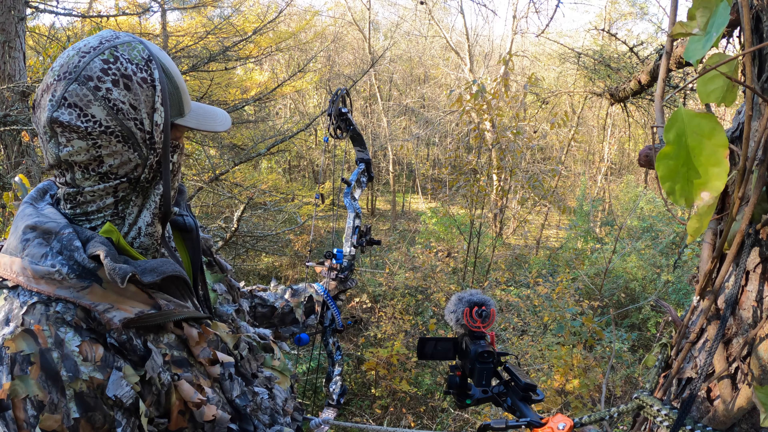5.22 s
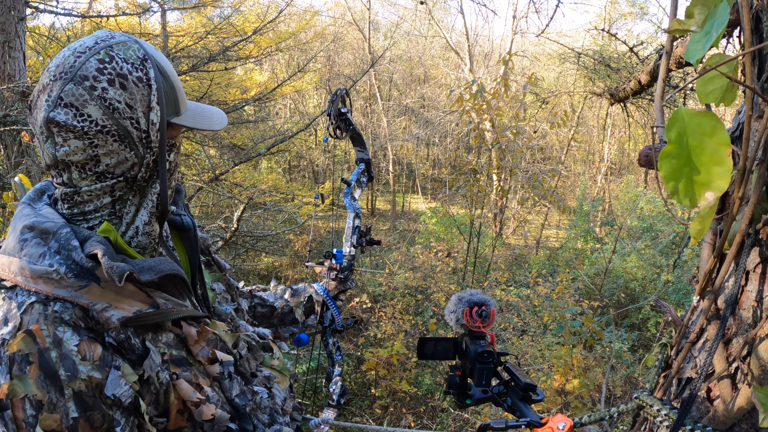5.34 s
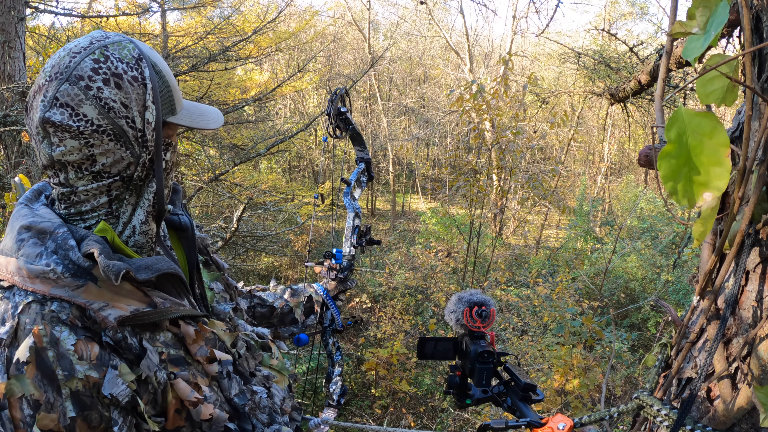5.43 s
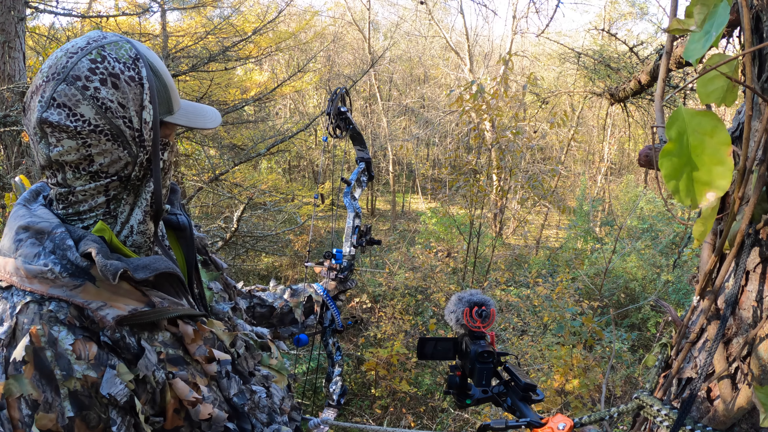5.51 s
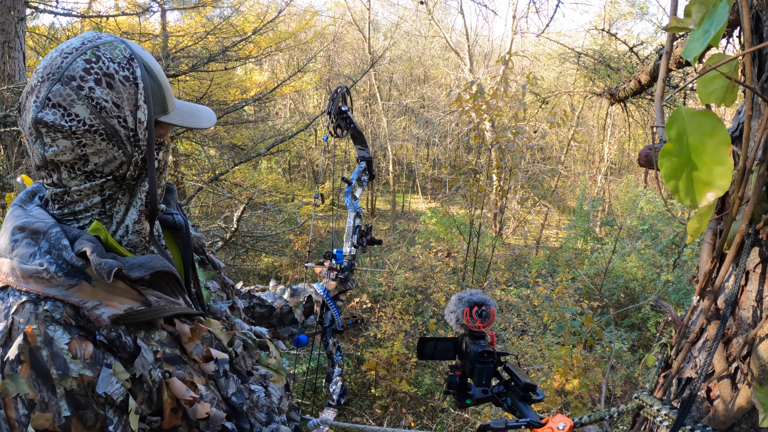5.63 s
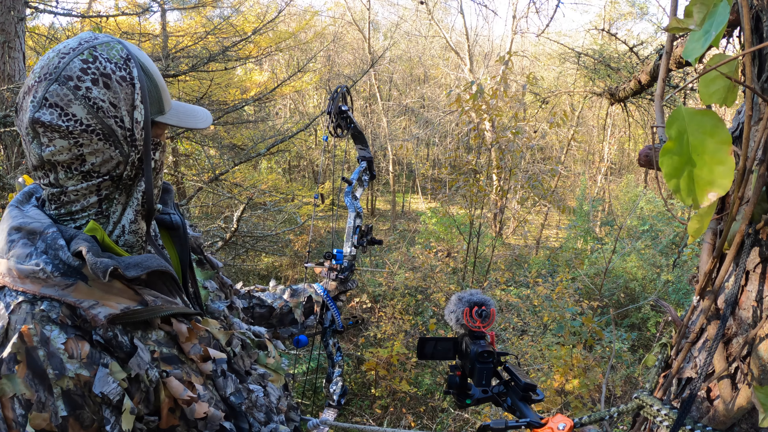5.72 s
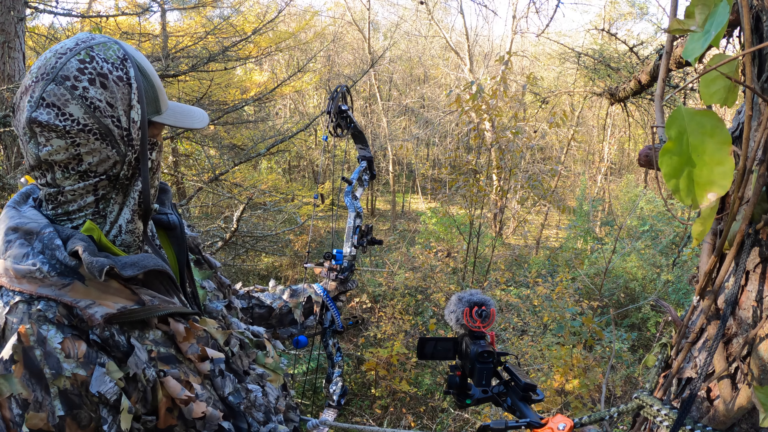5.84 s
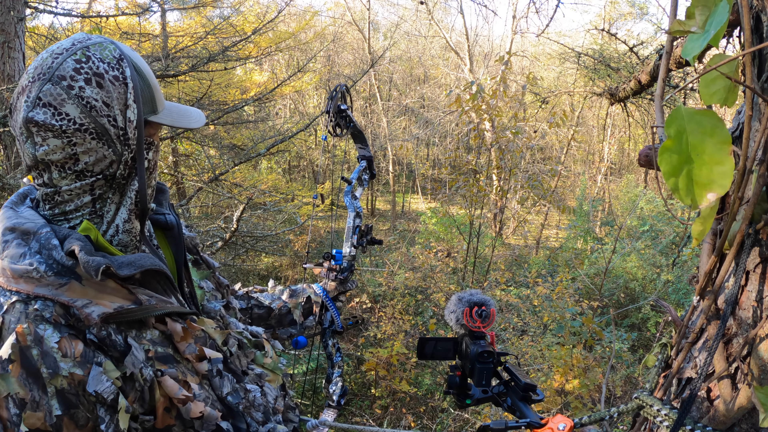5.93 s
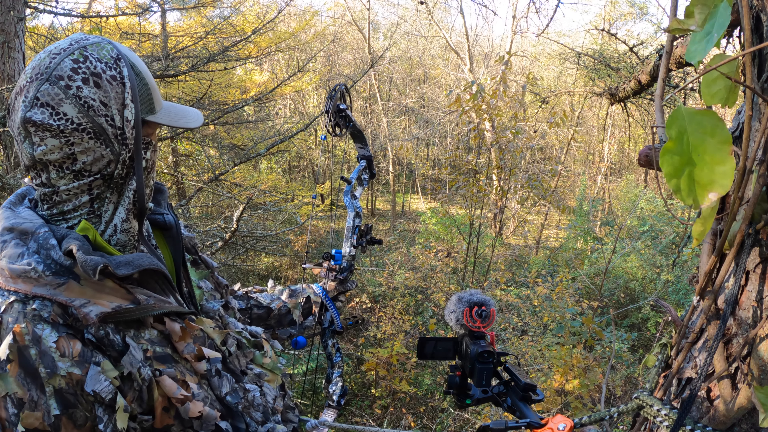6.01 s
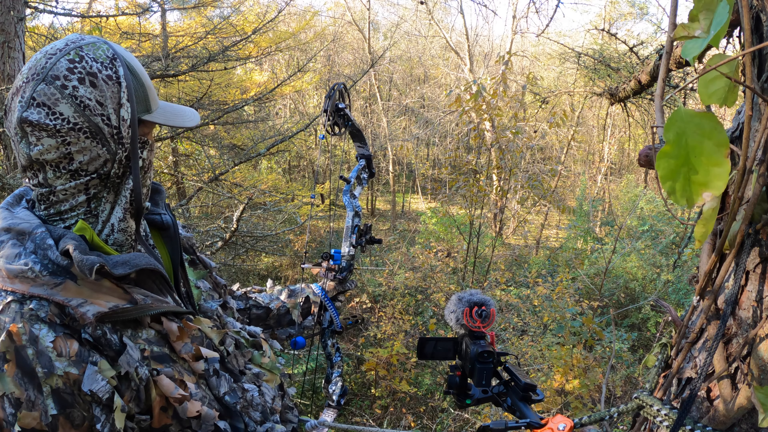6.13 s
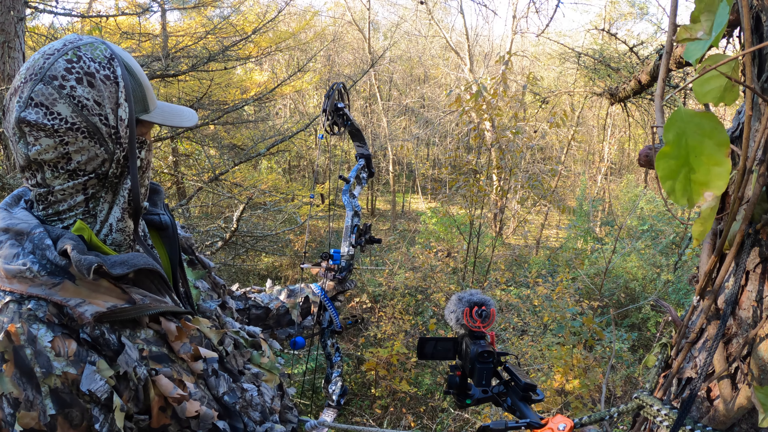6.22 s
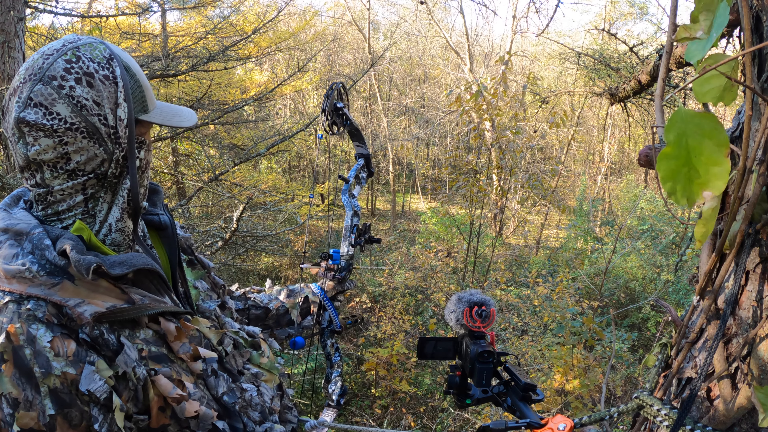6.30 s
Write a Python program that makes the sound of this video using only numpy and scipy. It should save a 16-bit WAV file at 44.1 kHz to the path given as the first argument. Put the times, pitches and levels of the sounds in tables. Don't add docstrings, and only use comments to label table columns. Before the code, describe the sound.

Outdoors in an open wood, a distant small propeller plane drones throughout, a low buzzing hum with a soft airy roar that wavers, grows stronger in the second half and sinks slightly in pitch. Thin high bird chirps come singly, then in a quick cluster midway. Dry twig ticks dot the quiet leaf hiss. Low wind puffs brush the stereo microphone, and a jacket rustles at the very end.

```python
import sys
import numpy as np
from scipy import signal
from scipy.fft import rfft, irfft
from scipy.io import wavfile
from scipy.ndimage import uniform_filter1d

SR = 44100
rng = np.random.default_rng(int(sys.argv[2]) if len(sys.argv) > 2 else 0)


def decibels_to_gain(level_db):
    exponent = np.asarray(level_db, float) / 20
    return 10 ** exponent


def wrap_up_sound(samples):
    columns = np.atleast_2d(samples).T
    tamed = np.clip(columns, -1, 1)
    steps = np.round(tamed * 32767).astype(np.int16)
    wavfile.write(sys.argv[1], SR, steps)


N = 280917

# t/s, level/dB, brightness/dB per octave
ROAR_COURSE = [(0.0, -52, -0.5), (1.2, -52, -0.1), (2.25, -53, 2), (2.42, -50, 2.5), (2.68, -47, -1),
               (3.1, -52.5, 1.5), (3.22, -47, -0.9), (3.73, -49.5, .5), (4.15, -47.5, 0.5),
               (4.26, -49.5, 1.5), (4.63, -43.5, -3.5), (4.85, -45.5, -1.5), (5.34, -54, 5),
               (5.55, -47.5, 2.5), (5.72, -45.5, 0.5), (5.95, -49, 2.5), (6.29, -43, 0.5), (6.37, -43, -4)]
BLADE_HZ, SINK_HZ_PER_S, SINK_HZ_PER_S2 = 90.05, .68, .03


def evened(x):
    return x / np.sqrt(np.mean(abs(x) ** 2) + 1e-20)


def read(points, hz):
    f, value = np.transpose(points)
    return np.interp(np.log(hz + 1), np.log(f + 1), value)


def curves(rows, t):
    s, *columns = np.transpose(rows)
    return [np.interp(t, s, c) for c in columns]


def wander(rate_hz):
    t = np.arange(0, N + 256, 256) / SR
    rates_hz = rate_hz * np.geomspace(.1, 1, 16)
    slow = sum(np.sin(2 * np.pi * (f * t + rng.random())) / np.sqrt(f) for f in rates_hz)
    return np.interp(np.arange(N) / SR, t, evened(slow))


def swells(rows, t):
    coarse = t[::128]
    total = 0 * coarse
    for s, half, db in rows:
        total = total + decibels_to_gain(db) * np.exp(-((coarse - s) / half) ** 2)
    return np.interp(t, coarse, total)


def ports(hz):
    # f/Hz, left minus right level/dB
    lean = [(60, -.3), (110, -.2), (200, -.7), (360, -1.2), (650, -2), (1200, -3.3), (2100, -2.8),
            (4000, -1.8), (7000, -2), (12800, -5)]
    # f/Hz, phase by which the left leads/rad
    lead = [(30, 0), (100, .01), (180, .075), (300, .175), (900, .4), (3000, .95), (4300, .01),
            (13000, -.1)]
    half = decibels_to_gain(read(lean, hz) / 2) * np.exp(.5j * read(lead, hz))
    return np.array([half, 1 / half])


def noise(field_db, patchy_db, size):
    # f/Hz, left-right coherence
    likeness = [(60, 1), (300, .995), (600, .93), (1280, .85), (2760, .73), (5900, .72), (12800, .62)]
    t = np.arange(4 * N // size + 5) * size / 4 / SR
    hz = np.fft.rfftfreq(size, 1 / SR)[:, None]
    a, b, c, d, patches = rng.standard_normal((len(t), len(hz), 5)).T
    patches = uniform_filter1d(patches, size // 80, 0)
    patches = evened(uniform_filter1d(patches, 16000 // size, 1))
    same = np.clip(read(likeness, hz), -1, 1)
    left = a + 1j * b
    right = same * left + np.sqrt(1 - same ** 2) * (c + 1j * d)
    spectra = np.array([left, right]) * ports(hz)
    spectra *= decibels_to_gain(field_db(t, hz) + patchy_db * patches)
    return evened(signal.istft(spectra, nperseg=size, noverlap=3 * size // 4)[1][:, :N])


def add(mix, s, sound, pan_db):
    part = mix[:, round(s * SR):][:, :sound.shape[-1]]
    part += (sound * decibels_to_gain(np.array([[.5], [-.5]]) * pan_db))[:, :part.shape[1]]


def trunks(x, t60):
    t = np.arange(SR // 2) / SR
    struck = rng.random((2, len(t))) < .012
    taps = rng.standard_normal((2, len(t))) * struck * decibels_to_gain(-60 * t / t60) * (t > .004)
    taps[1] += .35 * taps[0]
    taps = taps / np.linalg.norm(taps, axis=1, keepdims=True)
    return signal.fftconvolve(x, taps, axes=1)[:, :N]


def wood():
    # f/Hz, level/dB per Hz
    hiss_tone = [(1200, -39.5), (2000, -12.5), (3000, -2), (4500, -1), (6000, -1.5), (7800, -3), (8400, -9),
                 (11500, -14.5), (12600, -19), (13400, -28), (14200, -38), (16000, -65)]
    # t/s, half-length/s, level/dB
    leaf_stirs = [
        (.6, .2, -79),
        (2.4, .15, -82),
        (5.7, 0.04, -79),
        (5.97, 0.1, -75),
    ]
    t = np.arange(N) / SR
    level_db = -63 - 0.79 * t + .5 * wander(6.6)
    level = decibels_to_gain(level_db) + swells(leaf_stirs, t)
    return level * noise(lambda s, hz: read(hiss_tone, hz) + 0 * s, 1.0, size=512)


def wind():
    # f/Hz, level/dB
    puff_tone = [(8, -20), (22, -2), (40, 0), (65, -5), (100, -14), (200, -29), (400, -50), (1000, -110)]
    # t/s, half-length/s, level/dB
    gusts = [(0.47, 0.03, -45.9), (2.69, 0.08, -40.4), (3.22, 0.18, -44), (3.23, 0.049, -42),
             (3.42, 0.056, -42), (3.68, 0.12, -34), (3.85, 0.067, -31), (3.96, 0.03, -44),
             (4.06, 0.18, -35.5), (4.29, 0.037, -30.5), (4.41, 0.11, -34.5), (4.43, 0.034, -40),
             (4.63, 0.065, -33.5), (4.77, 0.03, -29), (4.87, 0.03, -30.5), (5.09, 0.08, -34),
             (5.19, 0.024, -33.5), (5.22, 0.094, -36), (5.6, 0.072, -46), (5.81, 0.06, -43),
             (5.9, 0.037, -37), (6.0, .05, -48), (6.13, 0.093, -35), (6.37, 0.061, -35)]
    hz = np.fft.rfftfreq(N, 1 / SR)
    puff, other = irfft(rfft(rng.standard_normal((2, N))) * decibels_to_gain(read(puff_tone, hz)), N)
    both_ports = np.array([1.32 * evened(puff), .68 * evened(puff + .12 * other)])
    return swells(gusts, np.arange(N) / SR) * decibels_to_gain(2.7 * wander(7.2)) * both_ports


def ticks():
    snaps = [(0.2377, -52, -2, 6900, 3030), (1.051, -59, -2.5, 5000, 3000), (1.8128, -55, -4, 5800, 2000),
             (1.8314, -48, -3, 6135, 2000), (2.673, -48, -3, 6000, 3500), (3.3257, -52, -4.5, 8160, 3500),
             (3.8707, -45.5, -5.5, 6550, 1500), (3.871, -52, -3.5, 11500, 8000),
             (3.875, -49, 0, 7300, 1502), (3.877, -51, -4, 4180, 1500), (3.9644, -53, -1, 6860, 1200),
             (5.1483, -49, 2, 4400, 1100), (5.65, -50, -1, 5130, 1100), (5.961, -43.5, -5.5, 6000, 4500),
             (6.2113, -56.5, -2, 9300, 2500), (6.218, -56, -8, 6500, 3983), (5.685, -53.5, -2, 6000, 3500),
             (5.756, -55, -2, 6520, 4000), (6.264, -41, -3, 5200, 2000), (6.288, -48, -1, 8500, 5000),
             (6.305, -52, -3, 10500, 5000), (6.312, -52, -2, 8000, 3000), (6.331, -43, 1, 4500, 1500),
             (5.703, -52, -2, 3000, 1200), (6.035, -61, -2, 7500, 3000), (6.225, -55, -2, 5200, 1500),
             (6.247, -52, -2, 5300, 1500), (6.256, -52, -2, 4200, 2000), (6.27, -50.5, -2, 7500, 2500),
             (6.294, -53, -2, 7600, 1500), (6.3, -50, -2, 5500, 2500), (6.304, -48, -2, 3200, 1500),
             (6.318, -54, -2, 9000, 2500), (5.889, -53, -2, 5600, 1500), (3.493, -54, -2, 4600, 1200),
             (3.636, -56, -2, 5800, 2000), (3.738, -51, -2, 4900, 1200), (6.2345, -57.5, -2, 10500, 4000),
             (6.344, -55, -2, 9000, 5000)]
    out, t = np.zeros((2, N)), np.arange(400) / SR
    for s, db, pan_db, hz, spread_hz in snaps:
        r = np.exp(-np.pi * spread_hz / SR)
        ring = [1, 0, -1, 1, -2 * r * np.cos(2 * np.pi * hz / SR), r * r]
        edge = (t == 0) + .25 * rng.standard_normal(len(t)) * decibels_to_gain(-60 * t / 0.009)
        snap = signal.sosfilt([ring, ring], edge)
        add(out, s, decibels_to_gain(db) * snap / abs(snap).max(), pan_db)
    return out + .35 * trunks(out, .08)


def birds():
    # t/s, start f/Hz, top f/Hz, length/s, level/dB
    chirps = [(0.362, 6500, 7500, 0.04, -56), (0.638, 6890, 7680, 0.055, -53),
              (1.221, 6630, 7280, 0.065, -54.5), (2.52, 6700, 7950, 0.022, -55.5),
              (3.376, 6770, 7800, 0.04, -52.5), (3.411, 7300, 8180, .035, -53.5),
              (3.435, 4620, 5660, 0.021, -68), (3.464, 6320, 7600, 0.038, -47.5),
              (3.48, 4300, 5400, .012, -63), (3.582, 6500, 7810, 0.05, -49.5),
              (3.659, 6150, 7360, .043, -48.5), (3.73, 4500, 5140, 0.017, -59.5),
              (5.277, 6600, 7280, 0.018, -59.5), (5.83, 6500, 7320, 0.063, -53)]
    slide_hz_per_s = 70000
    near_db, far_loss = -48.5, .5
    out, direct = np.zeros((2, 2, N))
    for s, start_hz, top_hz, length, db in chirps:
        climb_hz = top_hz - start_hz
        bend = max(slide_hz_per_s * length / climb_hz, 1)
        u = np.arange(round(length * SR)) / (length * SR)
        hz = top_hz - climb_hz * (1 - u) ** bend - top_hz * (.05 * u ** 5 + .4 * u ** 26)
        shape = np.minimum(u / .33, 1) * (1 - .7 * u) * np.minimum((1 - u) / .08, 1)
        hoarse = decibels_to_gain(3.0 * evened(uniform_filter1d(rng.standard_normal(len(u)), 130)))
        hz = hz + 55 * evened(uniform_filter1d(rng.standard_normal(len(u)), 100))
        tone = np.sin(2 * np.pi * np.cumsum(hz) / SR)
        whistle = np.sqrt(2) * decibels_to_gain(db) * shape * hoarse * tone
        add(out, s, whistle, -1.5)
        add(direct, s, whistle * decibels_to_gain(far_loss * min(db - near_db, 0)), -1.5)
    return 0.95 * direct + 0.68 * trunks(out, 0.32) + 0.34 * trunks(out, 0.8)


def rustle():
    # f/Hz, level/dB per Hz
    cloth_tone = [(1500, -32), (2700, -0.5), (4100, -2.5), (5100, -3), (6100, -7.5), (7700, -12),
                  (10000, -22), (13000, -25), (14500, -19), (15500, -21)]
    start_s, rise_s, hold_s, fall_s = 6.2, 0.06, 0.05, .04
    t = np.arange(N) / SR
    slips = decibels_to_gain(3.5 * np.minimum(rng.exponential(1, N), 4)) * (rng.random(N) < 1500 / SR)
    clumps = .65 + evened(signal.lfilter([1], [1, -.93], slips))
    corners_s = start_s + np.cumsum([0, rise_s, hold_s, fall_s])
    level = decibels_to_gain(-55.5) * np.interp(t, corners_s, [0, 0.72, 0.93, 0.43])
    brushing = noise(lambda s, hz: read(cloth_tone, hz) + 0 * s, 3.6, size=256)
    return level * evened(clumps * brushing)


def rumble():
    # f/Hz, level/dB
    rumble_tone = [(10, -16), (25, -4.5), (40, 2), (60, 9), (85, 8.5), (120, 4.5), (160, 3), (210, -3.5),
                   (250, -3), (330, -9.5), (450, -16), (600, -17.5), (900, -29.5), (2000, -100)]
    body = noise(lambda s, hz: read(rumble_tone, hz) + 0 * s, 1.0, size=4096)
    roar_db = curves(ROAR_COURSE, np.arange(N) / SR)[0]
    return decibels_to_gain(-39.3 + .25 * (roar_db - roar_db.mean())) * body


def roar_colour(s, hz):
    # f/Hz, level/dB
    roar_tone = [(300, -5), (600, 1.5), (800, -2.5), (1050, -1), (1400, -3.5), (2000, -9), (2600, -15),
                 (3500, -25), (5000, -34.5), (8000, -84)]
    # t/s, length/s, centre f/Hz, width/octaves, lift/dB
    eddies = [(1.353, 0.15, 1310, 0.16, 6.5), (1.843, 0.061, 1056, 0.26, 5.5), (2.375, 0.11, 1407, .19, 10),
              (2.504, 0.11, 2010, 0.13, 4.5), (2.7, 0.091, 1386, 0.18, 7), (3.3, 0.16, 935, 0.13, 8),
              (3.75, 0.35, 1420, 0.14, 4.5), (4.088, .06, 2000, 0.45, 5), (4.679, 0.1, 2200, 0.45, 8.5),
              (4.68, 0.17, 934, 0.16, 4.5), (5.897, 0.24, 957, 0.21, 8), (5.62, .14, 3200, 0.25, 4),
              (6.045, 0.033, 1910, 0.19, 11), (6.282, 0.075, 1033, 0.12, 8), (.94, .08, 1600, 0.32, 2),
              (1.44, .08, 737, 0.13, 9), (1.53, .07, 1880, .12, 5), (2.15, .08, 990, .12, 6),
              (2.31, .07, 2600, .12, 5.5), (2.46, .06, 1450, .1, 4), (2.81, .07, 1880, .12, 3.5),
              (2.97, .08, 980, .12, 3), (3.91, .06, 2200, .15, 3), (4.06, .05, 1580, .1, 6.5),
              (4.38, .08, 1470, 0.13, 6), (4.5, .07, 980, .12, 4), (4.66, .08, 3000, 0.2, 5),
              (4.8, .1, 1500, .2, 4.5), (4.91, .06, 2810, 0.3, 6), (5.29, .08, 980, .12, 7),
              (5.42, .08, 1550, .15, 5.5), (5.9, .07, 800, .1, 2.5), (6.12, .08, 3460, .12, 7),
              (6.36, .05, 3280, .15, 6.5), (.27, .08, 2120, .12, -4), (1.03, .1, 760, .12, -5),
              (1.9, .15, 720, .15, -5), (3.72, .08, 940, .12, -3.5), (4.19, .07, 860, .12, -5.5),
              (5.68, .17, 1750, .3, 4)]
    octaves = np.log2(hz + 1)
    focus = 0
    for at, length, centre_hz, width, db in eddies:
        distance = (octaves - np.log2(centre_hz)) / width
        focus = focus + db * np.exp(-((s - at) / length) ** 2 - distance ** 2)
    tilt = curves(ROAR_COURSE, s)[1] * (octaves - np.log2(1200))
    return read(roar_tone, hz) + tilt + focus


def blade_angle(t):
    return 2 * np.pi * np.cumsum(BLADE_HZ - SINK_HZ_PER_S * t - SINK_HZ_PER_S2 * t ** 2) / SR


def roar():
    t = np.arange(N) / SR
    turns = blade_angle(t)
    chop = 1 + 0.17 * np.cos(turns + .5 * wander(3.7)) + 0.052 * np.cos(turns / 2)
    body = noise(roar_colour, 1.0, size=1024)
    return decibels_to_gain(curves(ROAR_COURSE, t)[0] + 2.0) * chop * body


def tips():
    t = np.arange(N) / SR
    out = np.zeros((2, N))
    lift_db = -72.5 + 1.1 * (curves(ROAR_COURSE, t)[0] + 50)
    turns = blade_angle(t)
    for k in range(9, 25):
        level = decibels_to_gain(lift_db - 0.4376 * (k - 8) + 4.8 * wander(4))
        phase = k * turns + 1.47 * wander(5)
        out += (ports(k * BLADE_HZ)[:, None] * level * np.exp(1j * phase)).real
    return np.sqrt(2) * out


def own_swells(k, t):
    # t/s, multiple of the blade rate, half-length/s, level/dB
    blade_swells = [(0.34, 1, 1.28, -34.0), (1.18, 1, 0.21, -46.5), (1.78, 1, 0.48, -37),
                    (2.987, 1, 0.19, -47), (3.68, 1, 0.12, -44), (4.143, 1, 1.05, -28),
                    (4.23, 1, 0.15, -47), (5.15, 1, 0.054, -46), (5.6, 1, .17, -44), (6.13, 1, 0.51, -44.5),
                    (0.678, 2, 0.4, -43), (1.258, 2, 0.21, -40), (1.719, 2, 0.24, -36.5),
                    (2.13, 2, 0.18, -38.5), (3.003, 2, 0.45, -31.0), (3.82, 2, 0.37, -35.5),
                    (4.715, 2, 0.08, -49.5), (4.947, 2, 0.13, -54), (5.756, 2, 0.12, -50),
                    (6.072, 2, 0.92, -34.5), (0.448, 3, 0.33, -48.5), (0.78, 3, 0.21, -44),
                    (1.344, 3, 0.068, -53), (2.0, 3, 0.29, -43.5), (2.44, 3, 0.24, -38),
                    (3.267, 3, 0.42, -39.5), (3.819, 3, 0.15, -37.5), (4.672, 3, 0.3, -33.5),
                    (5.075, 3, 0.22, -35.5), (5.968, 3, 0.27, -32), (6.37, 3, 0.4, -35.5)]
    exhaust_swells = [(1.73, 1.5, 0.73, -47), (2.2, 1.5, 0.22, -50), (3.1, 1.5, 0.08, -50.5),
                      (3.57, 1.5, 0.11, -51), (4.17, 1.5, 0.25, -44), (6.29, 1.5, 0.16, -54.5),
                      (0.63, 4, 0.46, -52.5), (1.91, 4, .3, -60), (2.866, 4, 0.39, -50.5),
                      (3.822, 4, 0.44, -47.5), (4.6, 4, 0.067, -47), (4.93, 4, 0.22, -43.5),
                      (6.22, 4, 0.46, -43.5), (0.83, 5, 0.13, -56), (3.17, 5, 0.25, -55.5),
                      (4.74, 5, 0.21, -44.5), (5.48, 5, 0.14, -49.5), (6.34, 5, 0.5, -47.5),
                      (0.635, 6, 0.086, -58), (2.73, 6, 0.13, -54), (3.374, 6, 0.17, -45.5),
                      (4.113, 6, 0.16, -49.5), (4.6, 6, 0.12, -45), (5.56, 6, 0.18, -61),
                      (6.1, 6, 0.15, -55.5), (3.21, 7, 0.22, -56.8), (4.4, 7, 0.22, -56),
                      (4.7, 7, 0.12, -48.5), (5.448, 7, 0.38, -57.5), (6.303, 7, 0.11, -46.5),
                      (1.6, 6, 0.11, -58), (1.63, 7, 0.17, -62), (1.47, 8, .1, -60), (6.25, 8, .2, -58.5),
                      (1.23, 1.5, .15, -53), (4.65, 7.75, .2, -56), (1.68, 5, 0.13, -61),
                      (3.78, 7, .15, -61.5), (4.75, 4, .12, -50), (4.08, 7, .12, -57), (2.65, 5, .3, -63),
                      (4.2, 5, .2, -62), (2.0, 4, .12, -61), (2.8, 1.5, .15, -54)]
    minor_swells = [(.6, 2.25, .25, -62), (2.3, 2.25, .4, -55.5), (4.3, 2.25, .4, -47.5),
                    (5.9, 2.25, 0.46, -54.5), (1.9, 2.5, 0.37, -56.5), (3, 2.5, .3, -52),
                    (3.8, 2.5, .2, -54), (5, 2.5, .5, -54.5), (6.2, 2.5, .25, -54), (1.1, 2.75, .3, -60),
                    (3, 2.75, .2, -59), (4.1, 2.75, 0.28, -56.5), (4.6, 2.75, .2, -56.5),
                    (2.2, 3.25, .25, -63), (3.2, 3.25, .4, -61.5), (6.2, 3.25, .3, -47.5),
                    (1, 3.5, .2, -60), (2.73, 3.5, .25, -55), (3.75, 3.5, 0.26, -55),
                    (4.75, 3.5, .3, -48.5), (6.3, 3.5, .22, -51), (.8, 3.75, .35, -57.5),
                    (2.6, 3.75, 0.22, -59.5), (4.5, 3.75, .7, -52.5), (6.15, 3.75, .35, -50),
                    (1.1, 4.25, .3, -63), (2.67, 4.25, 0.31, -56.5), (4.55, 4.25, .4, -57),
                    (6.1, 4.25, .4, -57), (0.19, 4.5, 0.34, -57.5), (1.17, 4.5, 0.38, -56.5),
                    (3.23, 4.5, .4, -57.5), (4.8, 4.5, .3, -54.5), (1.78, 4.75, .2, -66),
                    (3.3, 4.75, .25, -59), (4.4, 4.75, 0.32, -58.5), (6, 4.75, .35, -57),
                    (0.58, 5.5, 0.18, -59), (4.7, 5.5, .25, -57), (6.2, 5.5, .3, -57),
                    (1.75, 5.75, 0.21, -58), (2.9, 5.75, 0.35, -62.5), (5.2, 5.75, 0.32, -62.5),
                    (3.4, 6.5, .2, -57), (4.5, 6.5, 0.23, -59.5), (2.62, 6.75, 0.26, -57),
                    (3.77, 6.75, 0.31, -59), (5, 6.75, .22, -56), (4.3, 7.25, 0.54, -58.5),
                    (6.03, 7.25, 0.32, -57.5)]
    late_swells = [
        (5.7, 2.5, .15, -54),
        (5.85, 3.5, .12, -52),
        (5.3, 2.25, .1, -56),
        (5.8, 4.5, .2, -62),
    ]
    every_swell = blade_swells + exhaust_swells + minor_swells + late_swells
    return swells([(s, half, db) for s, order, half, db in every_swell if round(4 * order) == round(4 * k)], t)


def tones():
    strong = (1, 2, 3, 4, 1.5, 5, 6, 7)
    calm_levels = (-51.5, -61, -64.5, -69.5, -62.5, -70.5, -64.5, -64)
    # multiple of the blade rate, level at mid-pass/dB, drift as exhaust turns away/dB per s
    weak_orders = [(2.25, -57, 0.5), (2.5, -58, 0.5), (2.75, -69, 0.5), (3.25, -64.5, 0.5), (3.5, -61, 1),
                   (3.75, -59, 0.5), (4.25, -59, 1.5), (4.5, -61, -0.5), (4.75, -65.5, 1.3),
                   (5.5, -63.5, 1.5), (5.75, -62.5, -0.7), (6.25, -71.5, 2.5), (6.5, -63, -1),
                   (6.75, -65, 0), (7.25, -66.5, 1.5), (7.75, -70, 1), (8, -69, 4.5)]
    t = np.arange(N) / SR
    turns = blade_angle(t)
    swell_db = 0.53 * (curves(ROAR_COURSE, t)[0] + 51)
    lines = []
    for k, calm_db in zip(strong, calm_levels):
        flutter_db = .48 if k in strong[:4] else 1.5
        lines.append((k, (decibels_to_gain(calm_db) + own_swells(k, t)) * decibels_to_gain(flutter_db * wander(13))))
    for k, db, drift_db in weak_orders:
        calm_db = db - 5.5 + drift_db * (t - t.mean()) + swell_db
        lines.append((round(4 * k) / 4, decibels_to_gain(calm_db + 2.25 * wander(3)) + own_swells(k, t)))
    out = np.zeros((2, N))
    for k, level in lines:
        phase = k * turns + 2 * np.pi * rng.random() + .07 * k * wander(3)
        out += (ports(k * BLADE_HZ)[:, None] * (np.sqrt(2) * level * np.exp(1j * phase))).real
    return out


def scene():
    surroundings = wood() + wind() + ticks() + birds() + rustle()
    airplane = rumble() + roar() + tips() + tones()
    return surroundings + airplane


def band_limit(x):
    return signal.sosfilt(signal.butter(12, 15300, fs=SR, output="sos"), x)


def record(dry):
    return band_limit(dry)


dry = scene()
out = record(dry)
wrap_up_sound(out)
```